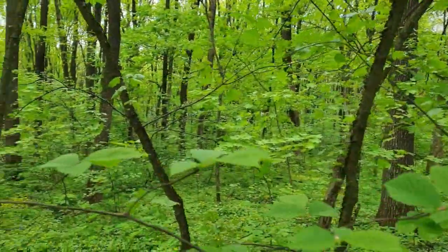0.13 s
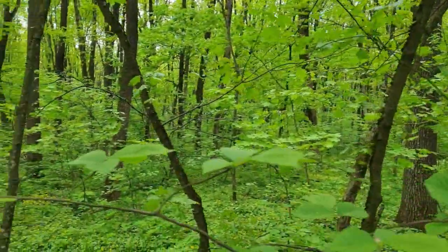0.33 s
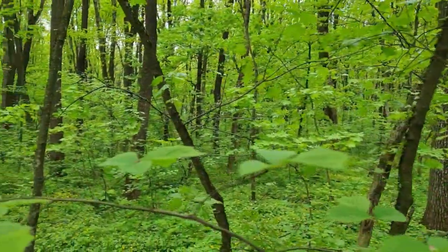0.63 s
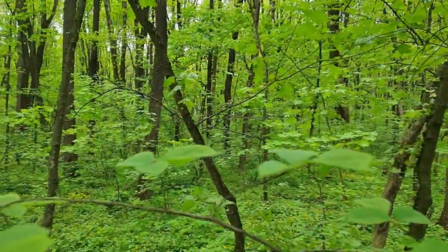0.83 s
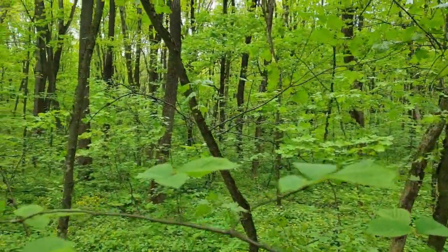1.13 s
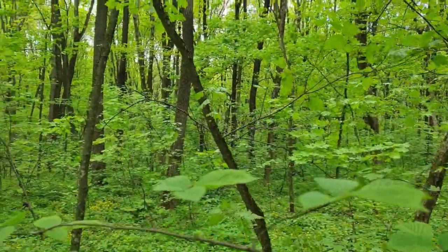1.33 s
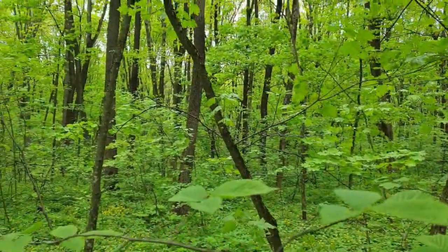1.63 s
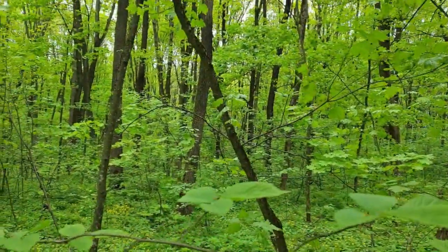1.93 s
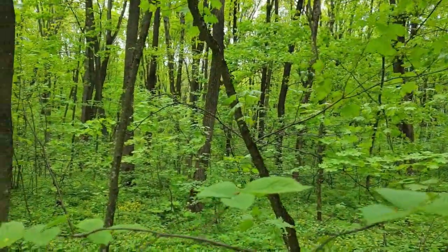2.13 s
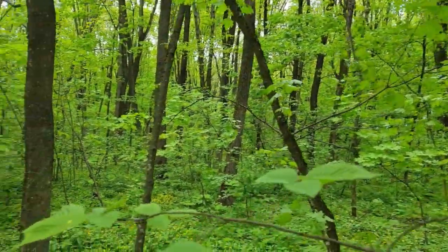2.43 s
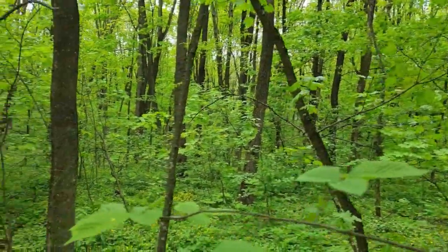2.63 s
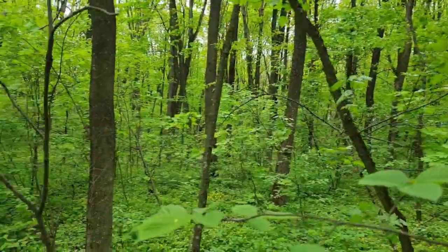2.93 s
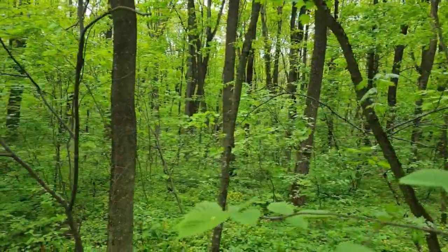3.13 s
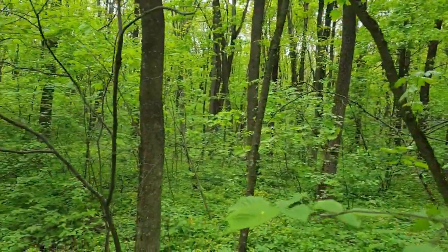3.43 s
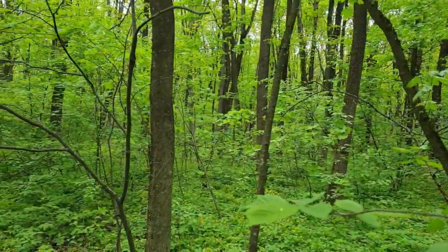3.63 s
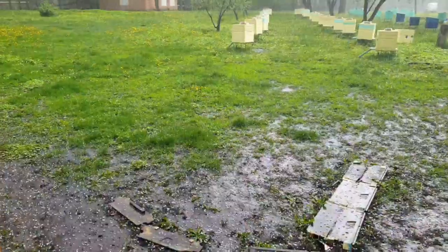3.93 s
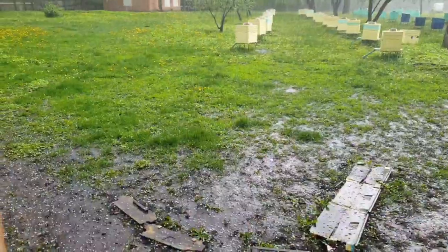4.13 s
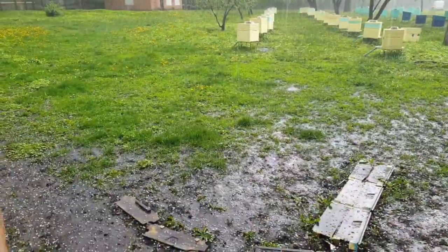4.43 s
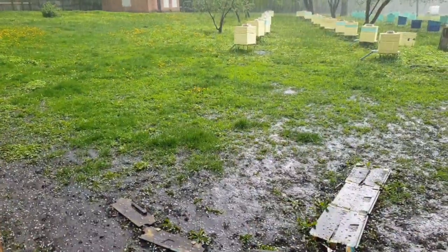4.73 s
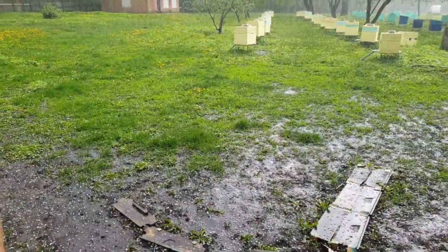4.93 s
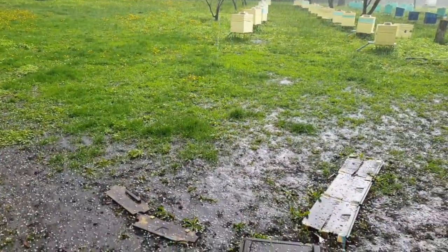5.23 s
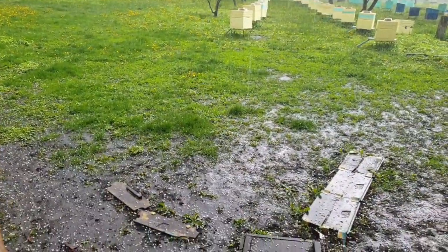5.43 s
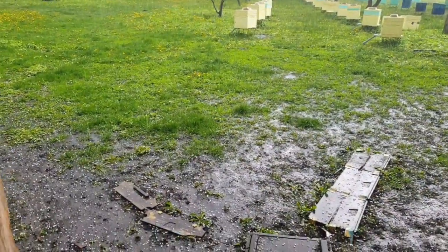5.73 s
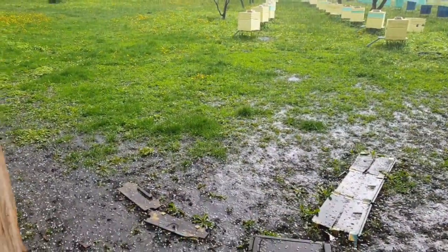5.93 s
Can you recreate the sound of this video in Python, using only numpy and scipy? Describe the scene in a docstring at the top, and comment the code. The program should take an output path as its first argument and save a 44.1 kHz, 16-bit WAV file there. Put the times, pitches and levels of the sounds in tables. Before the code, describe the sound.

Distant birds sing faintly in a quiet wood, with fluting whistles, thin high notes and a repeated buzzy call echoing among the trunks over a low rumble. A hand softly bumps the microphone and the sound stops for an instant. Then hail pours loudly onto grass and wet ground all around, a dense, steady patter with sharp cracks and dull thuds from the nearest stones.

```python
"""Birds sing far off in a quiet spring wood: fluting whistles, thin high notes and a repeated buzzy call,
all echoing among the trunks. The hand on the camera creaks and bumps it, and the sound stops for a moment.
Then hail pours onto grass and wet ground all round the microphone: countless stones merge into a dense
patter, while the nearest land with sharp cracks and dull thuds."""
import sys
import numpy as np
from scipy import signal
from scipy.fft import rfft, irfft, next_fast_len
from scipy.io import wavfile
from scipy.ndimage import map_coordinates

SR = 44100
rng = np.random.default_rng(int(sys.argv[2]) if len(sys.argv) > 2 else 0)


def wav_record(signal):
    """Record a signal, one row per channel, as 16-bit PCM in the file named by sys.argv[1]."""
    frames = np.transpose(np.atleast_2d(signal))
    bounded = np.clip(frames, -1, 1)
    # unit amplitude maps onto the largest positive 16-bit level
    quanta = np.round(bounded * 32767).astype(np.int16)
    wavfile.write(sys.argv[1], SR, quanta)


N = 268480
WOOD_END, HAIL_START = 3.686, 3.805  # seconds; silence lies between


def hail():
    """Stones all round the microphone patter on soil and clatter on ice; their thuds merge into drumming."""
    # Each row: time in seconds, strength of the fall in dB.
    fall = [(3.82, 0), (4.1, -0.65), (4.45, 0.5), (4.72, -0.8), (4.98, 0.1), (5.25, -1.16), (5.55, 0.8),
            (5.72, -0.45), (6.05, 1.06)]
    # Spectra of the patter, clatter and drumming. Each row: frequency in Hz, relative level in dB.
    soil_spectrum = [(150, -34.5), (330, 1), (480, -2.5), (660, 3.5), (850, 1), (1050, 1), (1350, -2),
                     (2000, -8.5), (3200, -6.5), (6000, -39)]
    ice_spectrum = [(700, -28.5), (1600, -3), (2600, -2.5), (4000, 0), (5600, 0.5), (6300, -5), (7100, -13),
                    (8400, -16.5), (10500, -8.5), (12700, -6.5), (14500, -9.5), (16000, -21)]
    drum_spectrum = [(20, -32), (33, -21), (55, 4), (70, -0.5), (95, 0.5), (130, 0.5), (180, -6.5),
                     (235, -1), (300, -8.5), (420, -18), (800, -33)]
    strength_db = over_time(fall)
    flurry_db = 0.68 * wobble(35)
    # separate impacts close by, over the even wash of the far field
    soil = impacts(rate=2200, spread_db=3.5, scatter_db=3.5, lag_s=0.00058) + amp(-2) * noise()
    ice = impacts(rate=3500, spread_db=3.5, scatter_db=2.5, lag_s=0.0005) + amp(0.5) * noise()
    drum = impacts(rate=450, spread_db=0.5, scatter_db=-0.5, lag_s=0.00017) + amp(-14.5) * noise()
    # as the fall strengthens, heavy stones add most to the low sounds
    soil_db = -41.5 + 1.66 * strength_db + flurry_db + 0.37 * wobble(60)
    ice_db = -34.5 + 0.94 * strength_db + flurry_db + 0.93 * wobble(90)
    drum_db = -39.5 + 1.6 * strength_db + 1.8 * wobble(25)
    return (amp(soil_db) * coloured(soil, soil_spectrum)
            + amp(ice_db) * coloured(ice, ice_spectrum)
            + amp(drum_db) * coloured(drum, drum_spectrum))


def near_stones(ring_db, spray_db, spray_life_s):
    """A stone close to the microphone cracks, touches down again and throws up ice and water."""
    # Each row: start in seconds, relative level in dB, pitch in Hz, relative weight of its spray in dB.
    stones = [(4.0814, -16.5, 5870, -8.5), (4.1274, -15, 3560, -13.5), (4.180, -17, 5600, -16),
              (4.2053, -19, 2600, -10), (4.226, -13.5, 4260, -20), (4.3915, -20, 2100, -13),
              (4.409, -15.5, 4000, -13.5), (4.9443, -19, 5300, -12.5), (4.9818, -18, 5270, -32),
              (5.031, -22, 1730, -3), (5.149, -20, 5140, -23), (5.173, -22.5, 5300, -6),
              (5.351, -17, 4080, -10), (5.532, -28.5, 5700, -3.5), (5.6861, -17, 4470, -13),
              (5.721, -6.5, 3650, -14), (5.7914, -20.5, 3400, -12), (5.821, -28, 4500, -1),
              (6.0077, -16.5, 5560, -8.5), (6.0585, -15, 5470, -22)]
    # Flying ice and water. Each row: frequency in Hz, relative level in dB.
    splash_spectrum = [(200, -45), (800, -16), (1500, -8), (2800, 0), (4200, 0), (5800, -2), (7200, -11),
                       (8500, -16), (12500, -7.5), (16000, -15)]
    out = np.zeros((2, N))
    t = np.arange(SR // 12) / SR
    for s, db, hz, splash_db in stones:
        ring = knock(hz, cycles=1.5, rise=1.5)
        bounce_s = rng.uniform(0.003, 0.007)
        for port, lag_s in zip(out, (0, rng.uniform(0.0001, 0.0002))):
            add(port, s + lag_s, amp(db + ring_db) * ring)
            add(port, s + bounce_s - lag_s, amp(db - 17) * ring)
        shatter = amp(-15) * np.exp(-t / 0.0014)  # the ice breaks in the first instant
        spray = (1 - np.exp(-t / 0.0012)) * np.exp(-t / spray_life_s)  # then the splinters fly
        spray *= amp(splash_db + spray_db + 3 * wobble(900, len(t)))
        add(out, s, amp(db) * (shatter + spray) * coloured(noise(len(t)), splash_spectrum))
    return out


def thuds():
    """Heavy stones land nearby, each with a low swing that dies almost at once."""
    # Each row: start in seconds, relative level in dB, pitch in Hz.
    landings = [(3.934, -31.5, 131), (4.188, -33, 119), (4.307, -36, 74.5), (4.431, -28, 204),
                (5.385, -25, 101), (5.574, -34, 130), (5.81, -28.5, 88), (5.975, -28, 110),
                (6.001, -25, 65)]
    out = np.zeros((2, N))
    for s, db, hz in landings:
        add(out, s, amp(db) * pan(4 * rng.standard_normal()) * knock(hz, cycles=0.7, rise=0.41))
    return out


def puddle_ticks(rate, level_db, centre_hz, cycles):
    """Stones in the wet ground to either side ring briefly, each at its own pitch."""
    out = np.zeros((2, N))
    count = int(rate * (N / SR - HAIL_START))
    starts = rng.uniform(HAIL_START, N / SR - 0.01, count)
    for s, (size, pitch, side) in zip(starts, rng.uniform(-0.91, 1, (count, 3))):
        tick = knock(centre_hz * 2 ** (0.75 * pitch), cycles, rise=0.21)
        add(out, s, amp(level_db + 2 * size) * pan(9 * side) * tick)
    return out


def whistlers(level_db, wet_db, settle):
    """Distant birds slide pure notes onto their pitch and waver around it."""
    # Each row: start and length in seconds, first and target pitch in Hz, relative level in dB,
    # left over right in dB, warble as a share of the pitch.
    notes = [(0, 0.042, 5350, 5240, -60.5, -1, 0.031), (.03, 0.057, 1267, 1190, -75.5, 5, 0.038),
             (.565, 0.13, 2150, 1794, -60, 8, 0.031), (.72, 0.096, 1814, 1877, -55, 7, 0.0089),
             (0.958, 0.15, 1606, 1582, -70.5, 12, 0.038), (1.144, .18, 2030, 1880, -53.5, 3.5, 0.021),
             (1.476, .18, 2286, 2180, -55, 4, 0.0092), (1.51, 0.131, 4200, 4320, -65.5, -5, 0.021),
             (2.021, 0.35, 1330, 1320, -81.5, 10, 0.062), (2.019, 0.15, 2150, 1990, -67.5, 10, 0.055),
             (2.158, 0.05, 2047, 1910, -61, 17, 0.039), (2.16, 0.08, 2490, 2444, -67.5, 8, 0.025),
             (1.999, 0.14, 6250, 6400, -81.5, 17, 0.027), (2.203, 0.15, 6270, 6260, -80.5, 15, .05),
             (2.603, 0.14, 6300, 6250, -82, 10, 0.05), (2.849, 0.072, 5650, 5710, -67.5, 1, 0.032),
             (3.093, 0.075, 5400, 6250, -74.5, 11, 0.086), (3.141, 0.064, 4480, 4385, -62, -1, 0.0095),
             (3.374, 0.074, 4300, 4326, -66, -7, 0.011), (3.31, 0.23, 1890, 1940, -77, 17, 0.022),
             (3.495, 0.083, 6360, 6320, -79.5, 14, 0.017)]
    out = np.zeros((2, N))
    for s, length, start_hz, end_hz, db, lean_db, warble in notes:
        progress = np.linspace(0, 1, int(length * SR))
        hz = end_hz + (start_hz - end_hz) * np.exp(-progress / settle)
        hz *= 1 + warble * wobble(262.4, len(hz))
        note = np.sin(2 * np.pi * np.cumsum(hz) / SR) * signal.windows.tukey(len(hz), 0.65)
        add(out, s, amp(db + level_db) * pan(lean_db) * among_trunks(note, wet_db))
    return out


def finch(start_hz, end_hz, swing_hz, trill_hz, level_db, wet_db):
    """A finch far off, a little to the left: one tone, trilled fast, that climbs as it swells."""
    # Each row: start and length in seconds, relative level in dB, left over right in dB, pitch shift in Hz.
    buzzes = [(0.239, 0.21, -62, 3, -70), (1.248, 0.14, -59, 4, -1.5), (2.577, .19, -61, 4.5, -1.5),
              (3.514, 0.13, -57.5, 5, 16)]
    out = np.zeros((2, N))
    for s, length, db, lean_db, shift_hz in buzzes:
        progress = np.linspace(0, 1, int(length * SR))
        trill = np.sin(2 * np.pi * trill_hz * length * progress + 0.5 * wobble(40, len(progress)))
        climb_hz = shift_hz + start_hz + (end_hz - start_hz) * progress
        hz = climb_hz + swing_hz * trill + 70 * wobble(490, len(progress))
        swell = np.abs(np.sin(np.pi * progress ** 1.12)) ** 0.72
        call = np.sin(2 * np.pi * np.cumsum(hz) / SR) * swell * amp(2.4 * trill)
        add(out, s, amp(db + level_db) * pan(lean_db) * among_trunks(call, wet_db))
    return out


def among_trunks(call, wet_db):
    """A call and its diffuse echo, which builds as more trunks answer; each band dies at its own speed."""
    # Each row: frequency in Hz, seconds for the echo to fall by 60 dB.
    decay_times = [(500, 1.06), (2000, 1.17), (4000, 0.97), (7000, 1)]
    hz, t, bands = signal.stft(noise(SR), SR, nperseg=256)
    build = 1 - np.exp(-t / 0.0084)
    decay = amp(-60 * t / along(decay_times, hz)[:, None])
    _, tail = signal.istft(bands * build * decay, SR, nperseg=256)
    echo = signal.fftconvolve(call[None], tail, axes=1)
    echo *= amp(wet_db) * np.linalg.norm(call) / np.linalg.norm(echo, axis=1, keepdims=True)
    echo[:, :len(call)] += call
    return echo


def handling():
    """The grip creaks in quick slips, then a finger clicks on the case and bumps the left microphone port."""
    # Each row: start and length in seconds, level in dB.
    creaks = [(3.444, 0.034, -65), (3.607, 0.037, -66)]
    # Spectra of the creak and the click. Each row: frequency in Hz, relative level in dB.
    grip_spectrum = [(2500, -31), (4400, 3), (6000, -13), (8000, -33), (11000, -16), (13000, -11),
                     (16000, -19)]
    case_spectrum = [(300, 1), (1500, -5), (5000, -3), (7500, -29), (16000, -28)]
    out = np.zeros((2, N))
    for s, length, db in creaks:
        t = np.arange(int(length * SR)) / SR
        slips = np.exp(-4 * (t * 240 % 1))  # 240 slips a second
        add(out, s, amp(db) * coloured(slips * noise(len(t)), grip_spectrum))
    t = np.arange(SR // 50) / SR
    click = coloured(noise(len(t)) * np.exp(-t / 0.0015), case_spectrum)
    add(out, 3.6485, amp(-61) * click)
    add(out, 3.6495, amp(-33.5) * pan(27) * knock(hz=76, cycles=0.56, rise=1.1))
    return out


def far_thrush(rest_db, attack_s, fade_db_per_s):
    """A thrush deep in the wood: its phrases rise as a blurred twitter out of a faint bed of song."""
    # Each row: start and length in seconds, level in dB.
    phrases = [(.8, 0.38, -75), (1.13, .76, -66.5), (2.13, 0.13, -80)]
    # Each row: frequency in Hz, relative level in dB.
    twitter_spectrum = [(1200, -31.5), (1900, -8), (2600, -2), (3200, -3), (3900, -10.5), (4600, -13),
                        (6000, -43.5)]
    t = np.arange(N) / SR
    power = amp(rest_db) ** 2
    for s, length, db in phrases:
        attack = np.clip((t - s) / attack_s, 0, 1)
        fade_db = fade_db_per_s * np.maximum(t - s - length, 0)
        power = power + (attack * amp(db - fade_db)) ** 2
    return np.sqrt(power) * amp(2.9 * wobble(21)) * pan(1.5) * coloured(noise(), twitter_spectrum)


def far_chorus():
    """Many far birds, mostly to the right, blur into one flickering band of song."""
    # Each row: time in seconds, level in dB.
    levels = [(0, -69), (.5, -68.5), (1.1, -67.5), (1.6, -68), (2.2, -72), (2.9, -71.5), (3.6, -69)]
    # Each row: frequency in Hz, relative level in dB.
    song_spectrum = [(2400, -27.5), (3050, 2.5), (3800, -1), (4400, -6.5), (5200, -5), (6000, -16.5),
                     (6800, -24.5), (7600, -44)]
    return amp(over_time(levels) + 1.4 * wobble(16)) * pan(-10.5) * coloured(noise(), song_spectrum)


def rumble():
    """Air and far traffic rumble in long waves that reach both ports much alike."""
    # Each row: frequency in Hz, relative level in dB.
    rumble_spectrum = [(15, -44.5), (25, -12), (59, 2), (78, -3), (175, -18.5), (266, -16.5), (389, -25),
                       (459, -19.5), (792, -35), (1300, -35.5), (1690, -60), (2860, -120)]
    pressure = rng.standard_normal(N) + amp(-3) * noise()
    return amp(-68 + 1.5 * wobble(15)) * coloured(pressure, rumble_spectrum)


def wood_air():
    """Under a faint hiss, a brief low bump as the sound begins, then soft low swells of air."""
    # The bump, then the swells. Each row: time of the crest and width in seconds, level in dB.
    crests = [(0.01, 0.056, -60.5), (0.52, 0.18, -65.5), (0.996, .08, -58), (1.283, 0.15, -67),
              (2.307, 0.35, -61), (2.781, 0.032, -54), (3.385, 0.47, -63)]
    # Each row of both spectra: frequency in Hz, relative level in dB.
    hiss_spectrum = [(300, 6), (1000, 2.5), (2500, -0.5), (6000, -17), (7500, -17), (9000, -14),
                     (11500, -3), (15500, -5)]
    low_spectrum = [(20, -16), (45, 2.5), (85, -1.5), (130, -16), (220, -34), (600, -56)]
    t = np.arange(N) / SR
    hiss = amp(-75) * pan(-1.1) * coloured(noise(), hiss_spectrum)
    envelope = sum(amp(db) * np.exp(-2 * ((t - s) / width) ** 2) for s, width, db in crests)
    low_noise = coloured(rng.standard_normal(N) + amp(-2.5) * noise(), low_spectrum)
    return hiss + envelope * low_noise


def port_balance(sound):
    """The two microphone ports differ in sensitivity from band to band."""
    # Each row: frequency in Hz, left over right in dB.
    lean = [(100, 1.5), (300, 0.4), (700, 2.5), (1400, 3.0), (2400, 3.1), (3500, 5.2), (4500, 5.3),
            (5600, 5.7), (6800, 0.5), (8000, -4.8), (10000, -0.7), (12500, -0.8), (15000, -5.2)]
    return filtered(sound, lambda hz: pan(along(lean, hz)))


def impacts(rate, spread_db, scatter_db, lag_s):
    """Stones land at random, each with its own size, balance and delay between the ports."""
    count = int(rate * N / SR)
    at = rng.integers(0, N, count)
    delay = np.round(rng.uniform(-1, 1, count) * lag_s * SR).astype(int)
    size = amp(spread_db * np.minimum(rng.standard_normal(count), 2.6)) * rng.choice([-1, 1], count)
    left, right = size * pan(scatter_db * rng.standard_normal(count))
    return unit(np.array([np.bincount(at, left, N), np.bincount((at + delay) % N, right, N)]))


def knock(hz, cycles, rise):
    """A short damped swing of peak 1; decay and rise are counted in cycles."""
    phase = np.arange(int(8 * cycles * SR / hz)) * hz / SR
    swing = np.sin(2 * np.pi * phase) * np.exp(-phase / cycles) * (1 - np.exp(-phase / rise))
    return swing / np.abs(swing).max()


def amp(db):
    return 10 ** (np.asarray(db) / 20)


def unit(x):
    return x / np.sqrt(np.mean(x ** 2) + 1e-20)


def noise(size=N):
    return rng.standard_normal((2, size))


def along(points, hz):
    """Interpolate (Hz, value) points on a log axis."""
    knots_hz, values = np.transpose(points)
    return np.interp(np.log(hz + 1), np.log(knots_hz), values)


def over_time(points):
    """Interpolate (seconds, value) points at every sample."""
    return np.interp(np.arange(N) / SR, *np.transpose(points))


def wobble(rate, size=N):
    """A smooth random curve, rate knots a second."""
    knots = rng.standard_normal(int(size * rate / SR) + 4)
    return map_coordinates(knots, [np.arange(size) * rate / SR])


def pan(db):
    """Left and right gains of constant power for a level difference."""
    gains = amp(np.array([[0.5], [-0.5]]) * db)
    return gains / np.sqrt(np.mean(gains ** 2, axis=0))


def add(track, s, sound):
    """Mix a sound into a track at s seconds."""
    start = max(round(s * SR), 0)
    track[..., start:start + sound.shape[-1]] += sound[..., :N - start]


def filtered(x, response):
    """x through a gain that depends on frequency."""
    size = x.shape[-1]
    padded = next_fast_len(size + 8192, True)
    return irfft(rfft(x, padded) * response(np.fft.rfftfreq(padded, 1 / SR)), padded)[..., :size]


def coloured(x, spectrum, size=8192):
    """x through a causal filter with the given spectrum, at rms 1."""
    cepstrum = irfft(np.log(amp(along(spectrum, np.fft.rfftfreq(size, 1 / SR)))))
    cepstrum[1:size // 2] *= 2
    cepstrum[size // 2 + 1:] = 0
    impulse = irfft(np.exp(rfft(cepstrum)))
    return unit(signal.fftconvolve(x, impulse[None], axes=1)[:, :x.shape[1]])


def scene():
    """First the wood, a short silence, then the hail."""
    t = np.arange(N) / SR
    wood = whistlers(level_db=-2.5, wet_db=7.5, settle=0.217)
    wood += finch(start_hz=3480, end_hz=3900, swing_hz=280, trill_hz=52, level_db=-3.5, wet_db=10)
    wood += rumble() + far_thrush(rest_db=-82.5, attack_s=0.06, fade_db_per_s=41)
    wood += far_chorus() + wood_air() + handling()
    storm = hail() + puddle_ticks(rate=110, level_db=-35.5, centre_hz=3880, cycles=2.1)
    storm += near_stones(ring_db=-2.5, spray_db=-2.5, spray_life_s=0.011) + thuds()
    return wood * (t < WOOD_END) + port_balance(storm) * (t >= HAIL_START)


def record(dry):
    """The camera cuts off steeply above its band limit of 15950 Hz."""
    return filtered(dry, lambda hz: 1 / np.sqrt(1 + (hz / 15950) ** 300))


dry = scene()
out = record(dry)
wav_record(out)
```